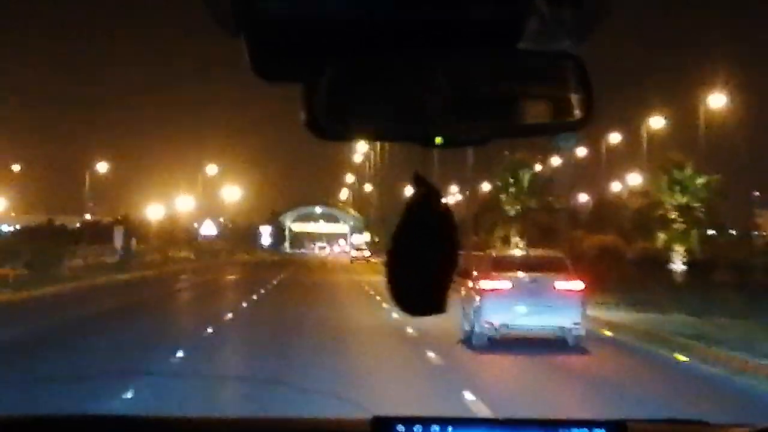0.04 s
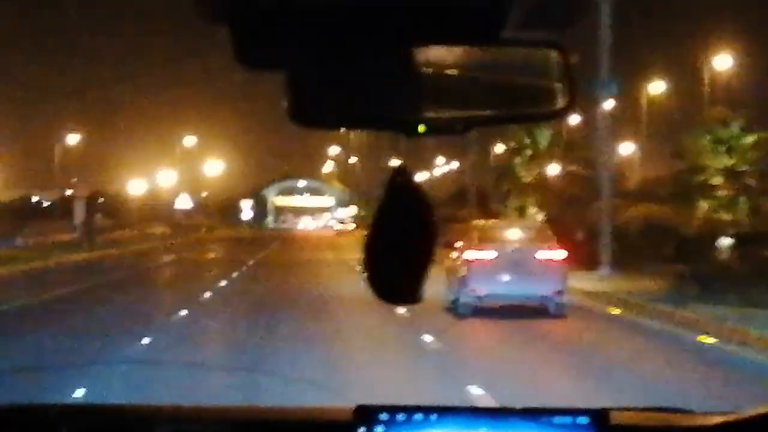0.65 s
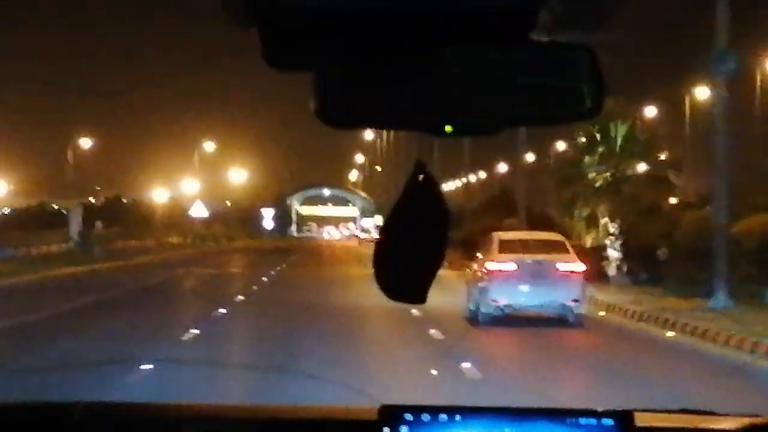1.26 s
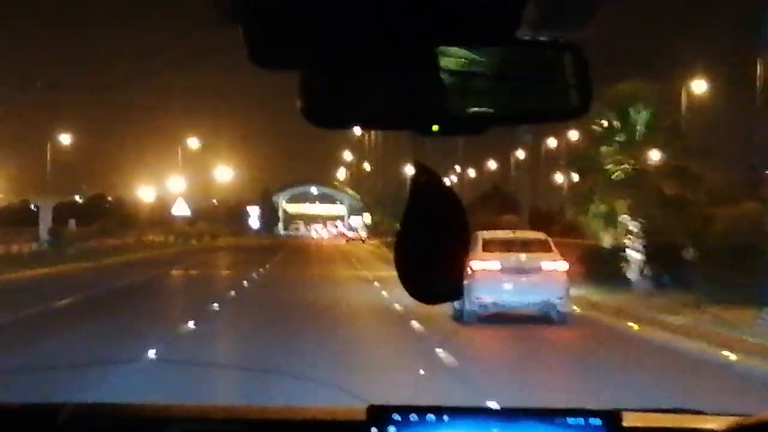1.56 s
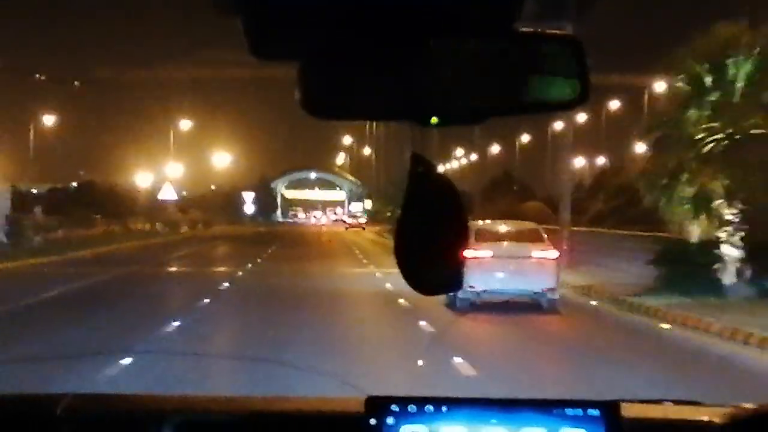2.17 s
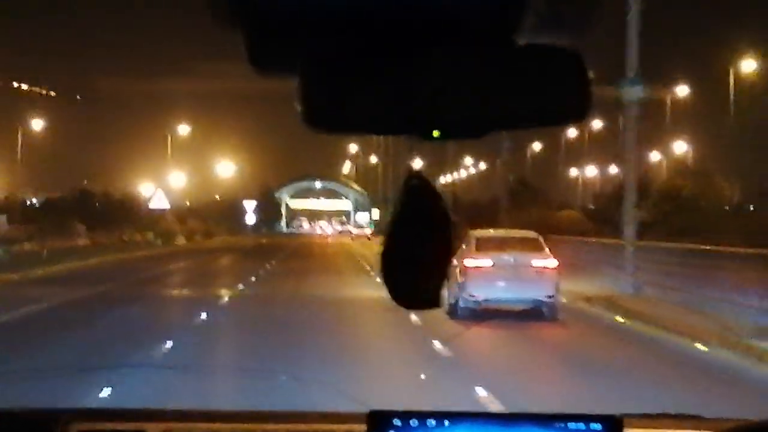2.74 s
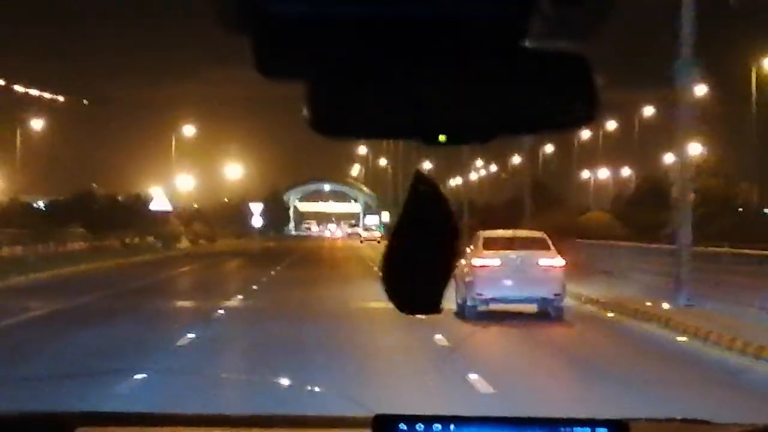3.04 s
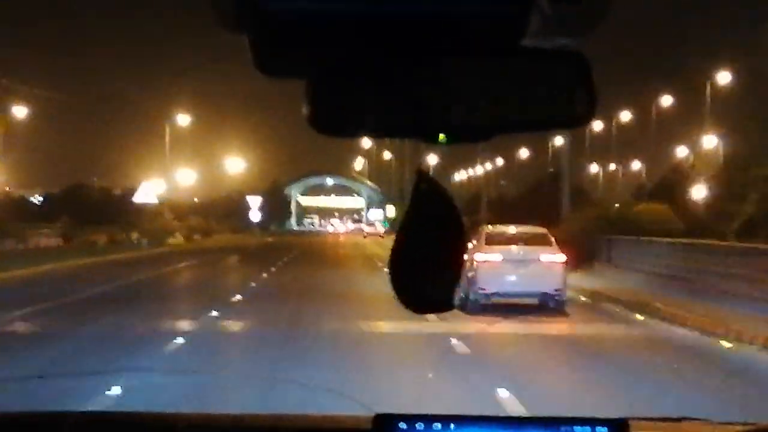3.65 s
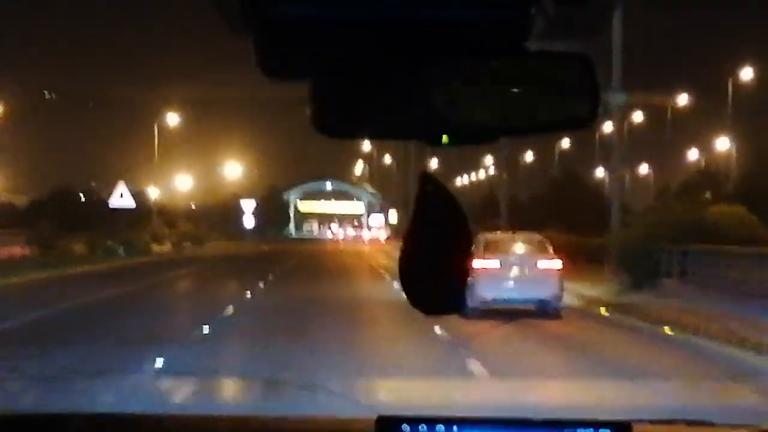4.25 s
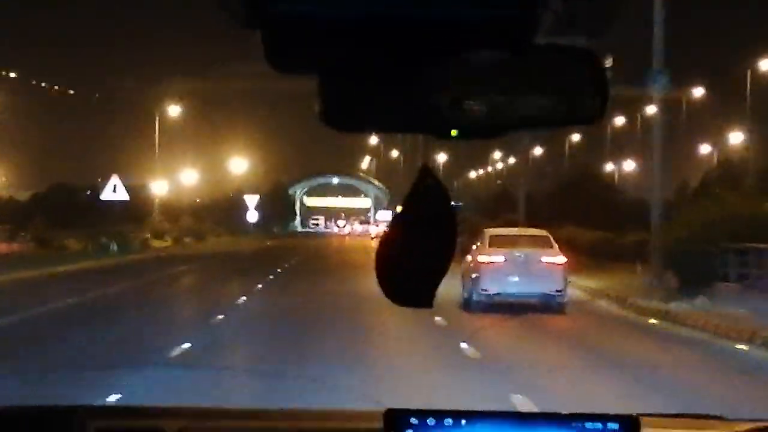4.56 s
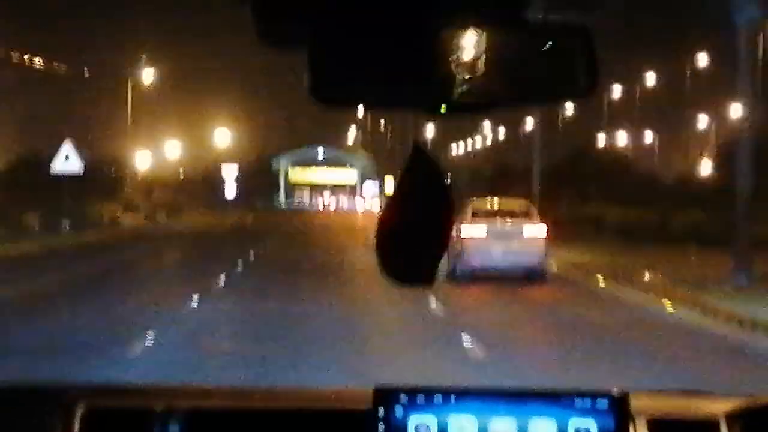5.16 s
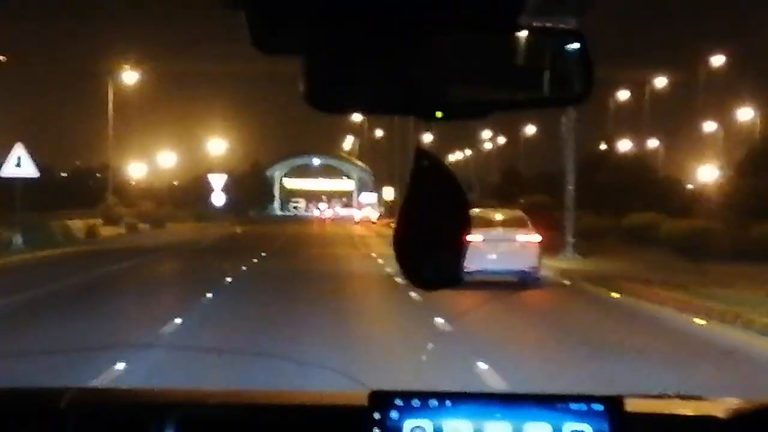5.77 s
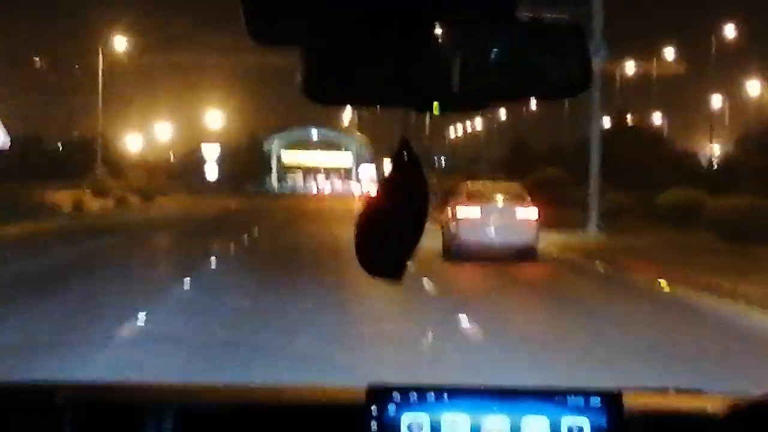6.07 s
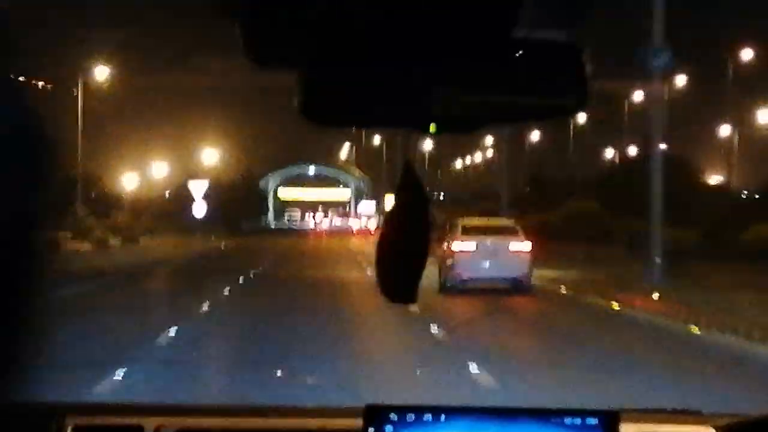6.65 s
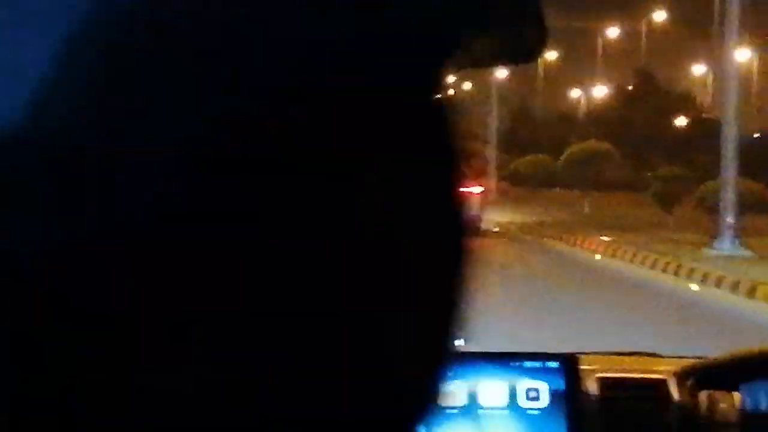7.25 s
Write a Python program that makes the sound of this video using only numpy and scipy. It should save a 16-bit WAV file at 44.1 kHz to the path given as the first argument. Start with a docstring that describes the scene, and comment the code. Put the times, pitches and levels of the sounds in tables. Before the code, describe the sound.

A deep, steady road rumble and tyre roar fill the cabin of a moving car throughout, with a light wind hiss and a faint engine hum that eases after about 3 seconds. It is heard through a hand-held phone, slightly stronger on the right. From 0.2 to 0.6 seconds the car hits a quick cluster of bumps: low booms, hollow tyre slaps and brief plastic creaks and clicks. The ride then evens out, with mild swells and a faint tread drone around 3 seconds. At about 5 seconds a finger gives one sharp, dry knock on the phone, on the left, amid small clicks, a faint rub and a couple of dull thumps. Another strong boom comes at 6 seconds. Around 7 seconds there is a softer bump, with light tyre slaps and a few plastic ticks, while the rumble carries on to the end.

```python
"""Inside a car on the highway

The road shakes the body and excites the low resonances of the cabin, which boom at bumps.
Above them lie the broadband roar of the tyres, a hiss of wind and faint hums of engine and tread.
Tyres slap over seams, plastic trim creaks and clicks, and fingers rub and knock a hand-held phone.
The phone hears it all through two microphone ports; its gain control ducks on the loud bumps."""
import sys
import numpy as np
from scipy import signal
from scipy.fft import rfft, irfft
from scipy.io import wavfile
from scipy.ndimage import uniform_filter1d

SR = 44100
rng = np.random.default_rng(int(sys.argv[2]) if len(sys.argv) > 2 else 0)


def dump(signal):
    """Clip the signal to [-1, 1] and save it as 16-bit WAV at the path in sys.argv[1]."""
    limited = np.clip(np.atleast_2d(signal).T, -1, 1)
    pcm = np.round(limited * 32767).astype(np.int16)
    wavfile.write(sys.argv[1], SR, pcm)


N = 326772
TIME, BINS = np.arange(N) / SR, np.fft.rfftfreq(N, 1 / SR)

# The sound field at the two ports. Each row: frequency in Hz, left-right correlation.
PORT_CORRELATION = [(60, .997), (100, .98), (140, .85), (230, .96), (350, .84), (500, .84), (650, .6),
                    (850, .57), (1130, .3), (1300, -.15), (1750, -.08), (2200, 0), (12000, .05)]
# Its imbalance. Each row: frequency in Hz, left minus right in dB.
PORT_BALANCE = [(60, -4.8), (250, -3.7), (600, -3.5), (1000, -4.3), (1250, -3.5), (1450, -.5), (1850, 1.5),
                (2050, -4.5), (3000, -7.5), (5500, -6.5), (6400, -2), (7500, -6.5), (11000, -7.5),
                (14000, -5)]
# Wind on the glass and pillars. Each row: frequency in Hz, relative spectral density in dB.
WIND_SPECTRUM = [(600, -7), (1200, 0.5), (1450, 1.5), (1850, 1.5), (2030, -8), (2350, -10), (2730, -8),
                 (2880, -10.5), (3800, -11), (5000, -16.5), (5700, -17.5), (6500, -24.5), (7400, -22),
                 (8300, -26.5), (9300, -29), (12000, -37), (13500, -48), (15000, -47)]
# The engine pulls, then eases off. Each row: time in seconds, cycle rate in Hz, level in dB.
ENGINE_CURVE = [(0, 29.05, -45.5), (.8, 29.42, -44.5), (1.6, 29.5, -45), (2.4, 29.63, -48),
                (3.1, 29.6, -47), (3.4, 29.2, -54), (4.2, 28.93, -50.5), (7.41, 28.4, -53.5)]
# Its harmonics. Each row: multiple of the cycle rate, relative level in dB.
ENGINE_ORDERS = [(6, -0.5), (7, -6.5), (8, -5), (9, -3.5), (10, -2.5), (13, -11), (14, -10.5)]
# The note of the air in the tyres. Each row: time in seconds, frequency in Hz, level in dB.
CAVITY_CURVE = [(0, 203.6, -70), (3.7, 200, -80), (4.3, 196.9, -62), (5.2, 199.2, -62), (5.9, 201.1, -49.5),
                (6.4, 200, -62), (7.41, 200.2, -73)]
# The tread over a change of surface. Each row: time in seconds, centre in Hz, level in dB.
DRONE_CURVE = [(2.5, 262, -82), (2.8, 263.7, -52), (3.2, 252, -47), (3.42, 357, -53), (3.9, 337.7, -60),
               (4.4, 336.7, -75)]
# The hand shifts its grip. Each row: midpoint in seconds, spread in seconds, level in dB.
GRIP_STROKES = [(4.955, .025, -61), (5.13, .035, -65), (7.07, 0.035, -62)]
# Skin sliding on the case. Each row: frequency in Hz, relative spectral density in dB.
SKIN_SPECTRUM = [(1000, -6), (3500, 3), (7000, -9), (12000, -11), (13500, -27), (15000, -32)]
# A finger strikes the case. One row: start in seconds, level in dB, left minus right in dB.
FINGER_KNOCK = (4.9884, -17, 30)
# The knock through the case. Each row: frequency in Hz, relative spectral density in dB.
CASE_SPECTRUM = [(150, -23), (620, 3.5), (1000, 2.5), (2000, -2.5), (2900, -7), (4300, -28), (7500, -40),
                 (9300, -29), (11000, -46), (15000, -65)]
# Creaking and clicking plastic. Each row: frequency in Hz, relative spectral density in dB.
PLASTIC_SPECTRUM = [(500, -2), (1700, 8), (2400, 2), (3400, -3), (4100, -2.5), (6000, -8), (7200, -10),
                    (8400, -10), (10000, -18), (12300, -22), (15000, -37)]
# Modes common to the plastic parts. Each row: frequency in Hz, width in Hz, relative gain in dB.
PLASTIC_RESONANCES = [(3370, 330, 3), (4530, 270, 2.5), (5730, 290, 1), (7150, 350, 3), (9600, 370, 3),
                      (12200, 600, 1)]
# Trim creaks as the body twists. Each row: start in seconds, level in dB, 60 dB decay time in seconds,
# left minus right in dB, tilt in dB per octave, the part's resonance in Hz.
TRIM_CREAKS = [(0.277, -47, .06, -1, 0, 3500), (.4175, -38, 0.024, -3, -2.5, 3450),
               (.425, -37, 0.052, -9, -2.5, 4000), (4.956, -50.5, 0.045, -14, 6, 5200),
               (7.070, -63, .06, -12, 5, 11000)]
# Plastic parts snap. Each row: start in seconds, level in dB, left minus right in dB, tilt in dB per
# octave, then the part's mode: frequency in Hz, width in Hz, relative gain in dB.
PLASTIC_SNAPS = [(0.3577, -35.5, -14, -2, 10300, 1200, 4), (.3709, -51, 12, 2, 8000, 2000, 1),
                 (0.4352, -43, 6, 4, 4400, 1500, 3), (4.9447, -34, 12, -2, 1820, 200, -1),
                 (4.9547, -37, -16, -1, 11000, 2500, 4), (4.977, -41, 9, -1, 4000, 1500, 0),
                 (5.0483, -31, -23, -2, 13700, 1200, 24), (5.0504, -37, -20, 4, 4700, 800, 3),
                 (7.2162, -30, -22, -3.5, 6400, 1800, 3), (7.269, -44, 12, -4, 2030, 70, 26)]
# Seams in the road. Each row: start in seconds, 60 dB decay time in seconds, then the levels in dB
# of the low, middle and high slap resonances.
ROAD_SEAMS = [(0.277, 0.074, -32, -36, -46), (.354, 0.035, -41, -36, -55), (0.5, 0.066, -29.5, -35.5, -43),
              (0.582, .045, -33, -50, -52), (2.701, .04, -38, -46, -61), (4.957, 0.069, -37, -50, -57),
              (5.131, 0.054, -41, -43, -53), (5.21, 0.062, -33, -34, -49), (6.196, 0.093, -41, -47, -62),
              (7.012, 0.13, -35.5, -39, -52), (7.075, 0.15, -39, -46, -58), (7.327, 0.04, -29, -41, -47)]
# The low, middle and high resonances of a slap. Each row: frequency in Hz, width in Hz.
SLAP_RESONANCES = [(660, 240), (1000, 160), (1700, 450)]
# Tyre roar through the floor. Each row: frequency in Hz, relative spectral density in dB.
ROAR_SPECTRUM = [(80, -3), (118, 2), (150, -2), (225, 2), (290, -3.5), (330, -5), (440, -9.5), (570, -7.5),
                 (720, -11), (830, -10.5), (1000, -17), (1300, -25), (2200, -55), (6000, -91)]
# The course of the roar. Each row: time in seconds, level in dB.
ROAR_CURVE = [(0, -39.5), (1, -39.5), (2.2, -39.5), (3.3, -40), (4.3, -41), (5.2, -39), (5.7, -40.5),
              (6.2, -40.5), (7.41, -40)]
# Panels that the roar excites. Each row: frequency in Hz, width in Hz, relative gain in dB.
PANEL_RESONANCES = [(381.7, 12.4, -8.5), (817, 72, -7), (1163, 64, 1.5)]
# Body shake, air boom and panel drum. Each row: frequency in Hz, width in Hz, level on plain road in dB.
CABIN_RESONANCES = [(29.85, 20, -37), (54.97, 13.9, -38), (96, 16.15, -40.5)]
# The road between bumps. Each row: time in seconds, waviness in dB (drives the shake),
# coarseness in dB (drives the boom and drum).
ROAD_SURFACE = [(0, -1.5, 0.5), (1.05, 3, 1), (1.45, -11, 2), (1.95, -2, 1), (2.45, 1.5, 1),
                (2.7, -6, -0.5), (3.07, -5.5, -7.5), (3.2, 3, 0), (4.05, -1, 0.5), (4.65, 0, -0.5),
                (5.7, 0, -2), (6.7, 0.5, -3.5), (7.41, -2, -1)]
# Bumps and rough patches. Each row: start in seconds, length in seconds, then the levels in dB
# of body shake, air boom and panel drum.
ROAD_BUMPS = [(0.236, 0.055, -45, -23, -37), (0.355, 0.083, -48, -15.5, -33.5),
              (0.47, 0.082, -25.5, -24, -33.5), (1.529, 0.22, -49, -32, -46),
              (2.048, 0.19, -37.5, -33.5, -57), (3.121, 0.19, -48, -34, -39), (3.41, 0.27, -32, -39, -46),
              (4.955, 0.13, -30.5, -29.5, -34), (5.146, 0.07, -27.5, -35, -35),
              (5.885, 0.084, -25, -28.5, -38.5), (5.995, 0.1, -25.5, -19.5, -27),
              (6.951, 0.16, -25.5, -47, -35)]


def gain_of(db):
    """Amplitude grows tenfold for every 20 dB."""
    return 10 ** (np.asarray(db) / 20)


def unit_rms(x):
    """Division by the root mean square gives unit power."""
    return x / np.sqrt(np.mean(x ** 2) + 1e-20)


def spectrum_at(points, hz=BINS):
    """Linear interpolation of a spectrum over log frequency."""
    knots, values = np.transpose(points)
    return np.interp(np.log(hz + 1), np.log(knots + 1), values)


def follow(rows):
    """Linear interpolation of each column over time."""
    times, *columns = np.transpose(rows)
    return [np.interp(TIME, times, column) for column in columns]


def pan(db):
    """A level difference places a source: left and right gains with mean 1."""
    gains = gain_of(np.array([db, -db]) / 2).reshape(2, -1)
    return gains / gains.mean(0)


def drift(hz):
    """Low-passed noise of unit power: a random fluctuation up to a given rate."""
    return unit_rms(irfft(rfft(rng.standard_normal(N)) / (1 + (BINS / hz) ** 4), N))


def resonance(hz, width):
    """An oscillator's power response, used as a steep-sided gain."""
    return 1 / (1 + ((BINS ** 2 - hz ** 2) / (BINS * width + 1e-9)) ** 2)


def mode(hz, width):
    """The complex response of a damped oscillator, which rings on after a blow."""
    return 1 / (1 + 1j * (BINS ** 2 - hz ** 2) / (BINS * width + 1e-9))


def cabin_noise(colour):
    """Partial coherence: noise at the two ports is alike in the bass, unrelated in the treble."""
    common, separate = rfft(rng.standard_normal((2, N)))
    correlation = spectrum_at(PORT_CORRELATION)
    right = correlation * common + np.sqrt(1 - correlation ** 2) * separate
    pair = irfft(np.array([common, right]) * colour * pan(spectrum_at(PORT_BALANCE)), N)
    return pair / pair.mean(0).std()


def burst(start, t60, rise_s):
    """A damped blow rises quickly and decays exponentially."""
    age = np.maximum(TIME - start, 0)
    return (1 - np.exp(-age / rise_s)) * np.exp(-np.minimum(np.log(1000) * age / t60, 20))


def jolt(start, length, rise_s=0.022, t60=0.3):
    """Forced vibration builds, holds while the wheels cross a bump, then decays freely."""
    age = TIME - start
    return np.clip(age / rise_s, 0, 1) * gain_of(-60 * np.clip((age - length) / t60, 0, 3))


def pulse(start, spectrum, tilt=0):
    """A minimum-phase impulse of peak 1, its spectrum tilted in dB per octave."""
    hz = abs(np.fft.fftfreq(2048, 1 / SR))
    octaves = np.log2(np.maximum(hz, spectrum[0][0]))
    log_gain = np.log(gain_of(spectrum_at(spectrum, hz) + tilt * octaves))
    click = np.fft.ifft(np.exp(np.conj(signal.hilbert(log_gain)))).real
    return np.pad(click / abs(click).max(), (round(start * SR), N))[:N]


def wind(level_db=-52.5, gust_db=0.43):
    """Turbulent air around the windscreen makes a nearly even hiss."""
    return gain_of(level_db + gust_db * drift(hz=9.4)) * cabin_noise(gain_of(spectrum_at(WIND_SPECTRUM)))


def engine(waver_db=2):
    """A periodic source sounds harmonics of its cycle rate; each wavers in level."""
    hz, db = follow(ENGINE_CURVE)
    cycles = np.cumsum(hz) / SR
    hum = np.zeros(N)
    for order, order_db in ENGINE_ORDERS:
        amplitude = gain_of(order_db + waver_db * drift(hz=1.8))
        hum += amplitude * np.sin(2 * np.pi * (order * cycles + rng.random()))
    return gain_of(db) * unit_rms(hum)


def tyre_cavity(waver_db=2):
    """Cavity resonance: the ring of air inside the tyres holds one faint note."""
    hz, db = follow(CAVITY_CURVE)
    tone = unit_rms(np.sin(2 * np.pi * np.cumsum(hz) / SR))
    return gain_of(db + waver_db * drift(hz=3.3)) * tone


def tread_drone(width_hz=50):
    """Narrow-band noise from the tread, its pitch following the texture of the road."""
    hz, db = follow(DRONE_CURVE)
    phase = 2 * np.pi * np.cumsum(hz) / SR
    band = drift(width_hz / 2) * np.cos(phase) + drift(width_hz / 2) * np.sin(phase)
    return gain_of(db) * unit_rms(band)


def grip_rustle(catch_db=1.0, side_db=-7):
    """Friction noise: fingers catch and slide on the case near the right port."""
    strokes = sum(gain_of(db) * np.exp(-((TIME - mid) / spread) ** 2) for mid, spread, db in GRIP_STROKES)
    rub = irfft(rfft(rng.standard_normal((2, N))) * gain_of(spectrum_at(SKIN_SPECTRUM)), N)
    return strokes * pan(side_db) * unit_rms(rub * gain_of(catch_db * drift(hz=150)))


def finger_knock():
    """Structure-borne sound: one dry pulse travels through the case to the left port."""
    start, db, side_db = FINGER_KNOCK
    return gain_of(db) * pan(side_db) * pulse(start, CASE_SPECTRUM)


def plastic_ring(excitation):
    """Damped modes of the plastic add a brief ring to whatever excites them."""
    modes = sum(gain_of(db) * mode(hz, width) for hz, width, db in PLASTIC_RESONANCES)
    return irfft(rfft(excitation) * (1 + modes), N)


def trim_creaks(ring_db=3, relative_width=0.41, rise_share=0.044):
    """Stick-slip friction: plastic parts rasp against each other, each around its own resonance."""
    grit = rfft(plastic_ring(rng.standard_normal((2, N)))) * gain_of(spectrum_at(PLASTIC_SPECTRUM))
    octaves = np.log2(np.maximum(BINS, PLASTIC_SPECTRUM[0][0]))
    out = np.zeros((2, N))
    for start, db, t60, side_db, tilt, hz in TRIM_CREAKS:
        colour = gain_of(tilt * octaves) * (1 + gain_of(ring_db) * resonance(hz, relative_width * hz))
        rasp = unit_rms(irfft(grit * colour, N))
        out += gain_of(db) * pan(side_db) * burst(start, t60, rise_share * t60) * rasp
    return out


def plastic_clicks():
    """Impulse response: a part snaps once and rings in its own mode and those common to the plastic."""
    out = np.zeros((2, N))
    for start, db, side_db, tilt, hz, width, ring_db in PLASTIC_SNAPS:
        response = 1 + gain_of(ring_db) * mode(hz, width)
        snap = irfft(rfft(pulse(start, PLASTIC_SPECTRUM, tilt)) * response, N)
        out += gain_of(db) * pan(side_db) * snap / abs(snap).max()
    return plastic_ring(out)


def seam_slaps():
    """Impact excitation: the tread slaps each seam with its own hollow mix of three resonances."""
    blows = np.array([burst(start, t60, rise_s=0.0025) for start, t60, *_ in ROAD_SEAMS])
    out = np.zeros((2, N))
    for (hz, width), seam_db in zip(SLAP_RESONANCES, np.transpose(ROAD_SEAMS)[2:]):
        out += (gain_of(seam_db) @ blows) * cabin_noise(resonance(hz, width))
    return out


def tyre_roar(flutter_db=0.18):
    """Rolling noise flutters with the grain of the asphalt and is coloured by resonant panels."""
    panels = sum(gain_of(db) * resonance(hz, width) for hz, width, db in PANEL_RESONANCES)
    colour = gain_of(spectrum_at(ROAR_SPECTRUM)) * (1 + panels)
    return gain_of(follow(ROAR_CURVE)[0] + flutter_db * drift(hz=26)) * cabin_noise(colour)


def road_rumble(hold_s=0.1, uneven_db=2.5):
    """Random forcing: the asphalt keeps each low cabin resonance going, a little unevenly."""
    wavy_db, coarse_db = follow(ROAD_SURFACE)
    out = np.zeros((2, N))
    for (hz, width, db), surface_db in zip(CABIN_RESONANCES, (wavy_db, coarse_db, coarse_db)):
        drive = gain_of(db + surface_db + uneven_db * drift(hz=3.1))
        ring = cabin_noise(resonance(hz, width))
        power = uniform_filter1d(ring.mean(0) ** 2, int(hold_s * SR))
        envelope = np.sqrt(uniform_filter1d(power, int(hold_s * SR / 2)) + 1e-9)
        out += drive * ring / envelope  # evens out the noise's own swells
    return out


def bump_booms(wander_share=0.3):
    """Bumps drive the cabin resonances to boom, each pitch wandering by a share of its width."""
    jolts = np.array([jolt(start, length) for start, length, *_ in ROAD_BUMPS])
    out = np.zeros(N)
    for (hz, width, _), bump_db in zip(CABIN_RESONANCES, np.transpose(ROAD_BUMPS)[2:]):
        cycles = np.cumsum(hz + wander_share * width * drift(hz=18)) / SR + rng.random()
        envelope = np.sqrt(gain_of(bump_db) ** 2 @ jolts ** 2)  # overlapping jolts add in power
        out += envelope * unit_rms(np.sin(2 * np.pi * cycles))
    return out


def scene():
    """Superposition: the pressures of all sources add at the two ports."""
    hums = (engine() + tyre_cavity() + tread_drone() + bump_booms()) * pan(db=-5.0)
    ride = road_rumble() + tyre_roar() + wind() + hums + seam_slaps()
    return ride + trim_creaks() + plastic_clicks() + grip_rustle() + finger_knock()


def record(dry, threshold_db=-25, squeeze=0.26, recover_db_per_s=35, window_s=0.0093, cutoff_hz=15100):
    """Compression: the gain ducks on loud bumps and recovers slowly; a low-pass limits the band."""
    power = uniform_filter1d((dry ** 2).mean(0), int(window_s * SR))
    power_db = 10 * np.log10(abs(power) + 1e-12)
    fall_db = TIME * recover_db_per_s
    held_db = np.maximum.accumulate(power_db + fall_db) - fall_db  # each peak sinks at a steady rate
    excess_db = np.maximum(held_db - threshold_db, 0)
    ducked = dry / gain_of(squeeze * uniform_filter1d(excess_db, size=400))
    low_pass = signal.firwin(511, cutoff_hz, window=("kaiser", 9), fs=SR)
    return signal.oaconvolve(ducked, low_pass[None], "same")


dry = scene()
out = record(dry)
dump(out)
```